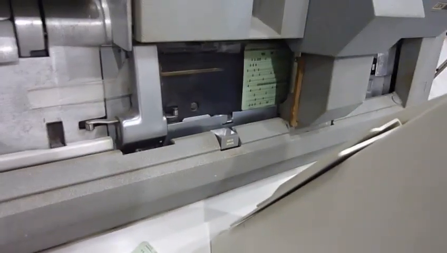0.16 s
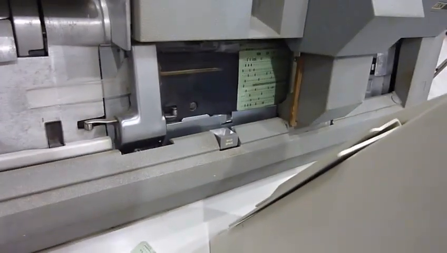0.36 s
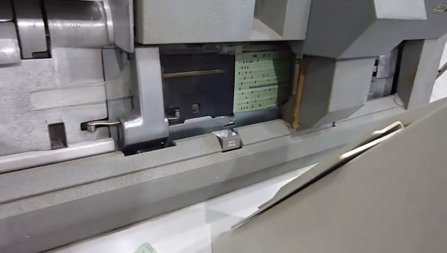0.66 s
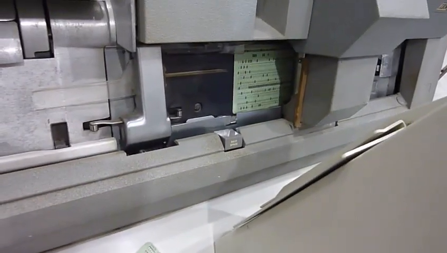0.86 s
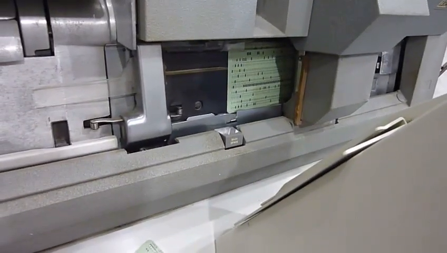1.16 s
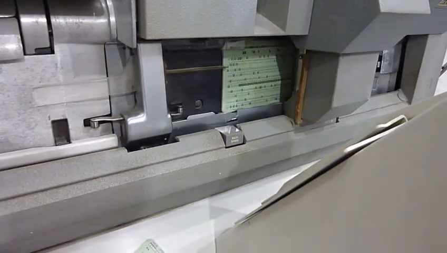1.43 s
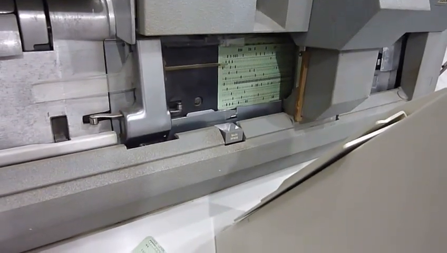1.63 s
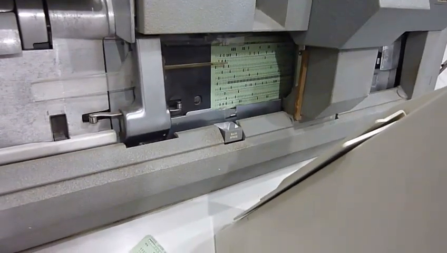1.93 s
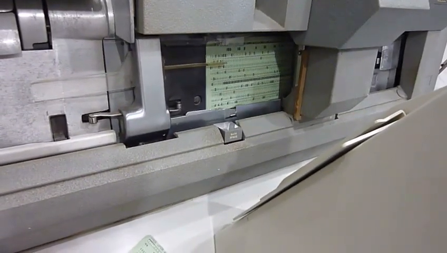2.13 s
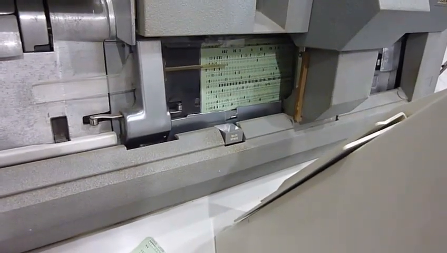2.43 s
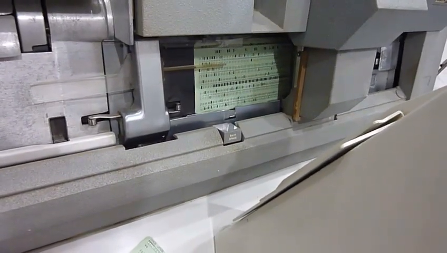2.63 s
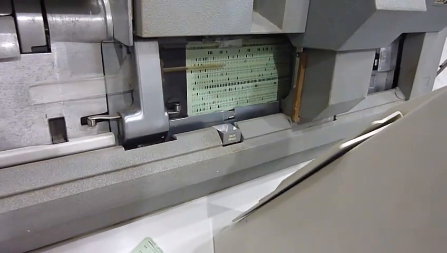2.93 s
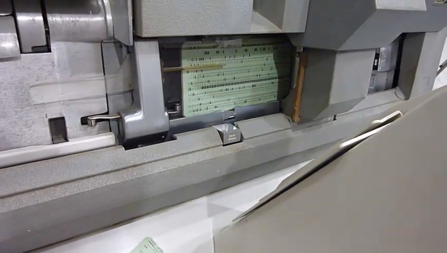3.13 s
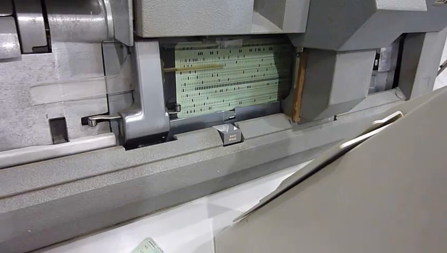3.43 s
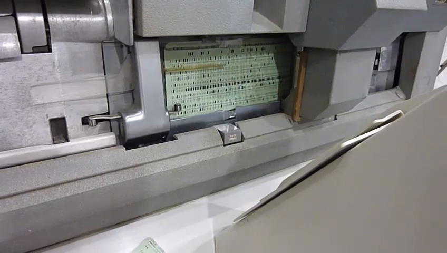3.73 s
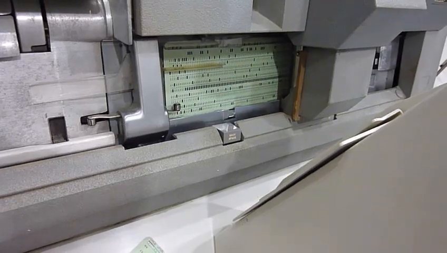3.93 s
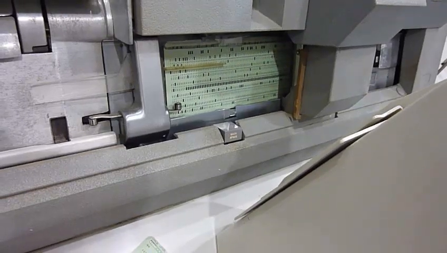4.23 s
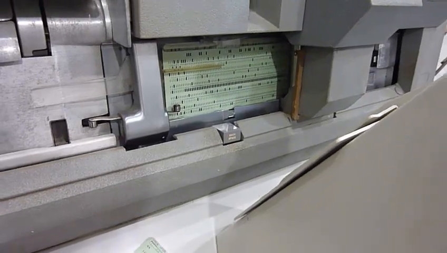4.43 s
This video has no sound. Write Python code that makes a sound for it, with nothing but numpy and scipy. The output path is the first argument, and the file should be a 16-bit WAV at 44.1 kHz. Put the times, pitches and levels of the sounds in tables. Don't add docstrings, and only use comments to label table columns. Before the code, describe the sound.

A dense, machine-gun-like mechanical clatter runs evenly from the start, each stroke mixing a sheet-metal knock, a sharp pawl snap and loose steel chatter, slightly different every time. After almost four seconds it ends abruptly with a light unloaded clack; room echo dies away and a much quieter idling motor hums, with small panel buzzes. Close, narrow-band stereo sound in a hard room.

```python
import sys
import numpy as np
from scipy import signal
from scipy.fft import rfft, irfft, next_fast_len
from scipy.io import wavfile
from scipy.ndimage import uniform_filter1d

SR = 44100
rng = np.random.default_rng(int(sys.argv[2]) if len(sys.argv) > 2 else 0)


def ratio(d):
    e = np.asarray(d, float) / 20
    return 10 ** e


def unload_wav(signal):
    wavfile.write(
        sys.argv[1],
        SR,
        np.round(np.clip(np.atleast_2d(signal).T, -1, 1) * 32767).astype(np.int16),
    )


N = 202013
LEAD = SR // 2
TURN_S, TURN_COUNT = .07771, 49
# (time [s], thud [dB], rattle [dB], clutch click [dB])
LAST_TURN = (3.845, -18, -12.5, -2)
LAST_S, LAST_THUD_DB, LAST_RATTLE_DB, LAST_CLICK_DB = LAST_TURN
# (frequency [Hz], level [dB])
MIC_RESPONSE = [(25, -30.5), (60, -16), (130, -15), (205, -15), (270, -1.5), (1500, 3.5), (1900, -3),
                (4400, -3.5), (7200, -2)]


def turns():
    # (time [s], shaft delay [ms])
    slip = [
        (0, -.4),
        (.9, -1.4),
        (.98, -.1),
        (2.22, -.2),
        (2.38, .9),
        (2.77, 0),
        (2.85, 1.9),
        (3.16, 1.9),
        (3.31, .6),
        (3.78, .4),
    ]
    # (side panel [dB], lid [dB], card bed [dB], pawl [dB])
    column_db = [(-4, -1.5, 2, 0), (2, -2.5, 2.5, 2), (0.5, 1.5, 3, 2), (-5.0, -2.5, 3, 2),
                 (-1, -2.5, 2, 3), (5.5, 0, 3.5, 2.5), (1.5, 0, -1.5, 1.5), (-11, 3, 0, 1.5),
                 (-3, -5.5, 2.5, 0), (-8.5, -2, -3.5, 0.5), (2, -3, 0, 4), (-1.5, -0.5, 2.5, -1),
                 (4.5, -1, -2, 4), (-2, 5, 1.5, 1.5), (3, -1.5, 2.5, 1.5), (7, 0.5, 1, 0.5),
                 (0, -1, -1, 2.5), (2, 0, -0.5, -2.5), (1.5, 0, 1, -0.5), (-6, -1, -1.5, 0.5),
                 (-5, 0, 0.5, 3), (-3.5, -1, 2, -0.5), (4, 1.5, -3, 0.5), (2, 2, 2.5, -0.5),
                 (-1, 0, 2.5, -1), (1, 1, -0.5, -1), (-7, 3.5, 0, 0.5), (-6, 0.5, 3, 3), (1, 0.5, -7, -2),
                 (1, -1.0, 3.5, 2), (0.5, 2, 3.5, 3.5), (1.5, -3, 1, -1.5), (3, 0, 1, 2),
                 (-1.5, -1, 3, -0.5), (4.5, 4.5, -1.5, 2.5), (0.5, 1.5, 2.5, -0.5), (4.5, -0.5, 2.5, 3.5),
                 (-8, 3.5, 0.5, 2.5), (-1, -1, 2, 2), (-8.5, 2.5, 0.5, 2.5), (-2.5, -1, 3, 2.5),
                 (3, -1.5, -1.5, 2), (-0.5, -0.5, -1, 0.5), (-2.5, 0.5, 2, 2), (4, 0, 0.5, 2),
                 (1, 0.5, 6, 1), (-2, 2.5, 0.5, 0), (-6, -5, 3, 1), (5, 0.5, -1.5, -2)]
    first_s = .0469
    s = first_s + TURN_S * np.arange(-5, TURN_COUNT)
    s = s + np.interp(s, *np.transpose(slip)) / 1000
    holes_db = np.pad(column_db, ((5, 0), (0, 0)))
    rattle_db = -0.82 * rng.standard_normal(len(s))
    loaded = np.column_stack([s, holes_db, rattle_db])
    return np.vstack([loaded, (LAST_S, 0, 0, 0, LAST_CLICK_DB, LAST_RATTLE_DB)]).T


def punch():
    # (time from punch [ms], pitch [Hz], width [Hz], T60 [ms], scatter [ms])
    linkage = [(-38, 4200, 5000, 40, 1), (-1, 2500, 5000, 9, .2), (-7, 3800, 2500, 16, .8),
               (30, 5200, 3500, 18, .5), (-4.2, 1900, 1400, 14, .3), (-4, 4700, 1500, 14, .4),
               (-1.5, 3300, 2200, 16, .6), (-1.5, 6500, 1500, 16, .3), (.6, 4700, 1300, 22, .4),
               (3.3, 2600, 1500, 16, .3), (7.5, 3000, 4000, 30, .9), (15, 1800, 1400, 30, 1),
               (21, 4000, 5000, 30, 2), (30, 2200, 900, 14, .5), (-9.5, 5200, 3500, 35, 1.8),
               (-7.5, 5750, 300, 14, .4), (31, 2750, 500, 14, .6)]
    linkage_db = [-14, -13, -4, -10, -4, -9, 0, -24.5, -12.5, 4, -2, -3, -10.5, -10.5, -8, -3, -22.5]
    # (time from release [ms], pitch [Hz], width [Hz], T60 [ms], scatter [ms])
    pawl = [
        (.3, 3500, 300, 9, .12),
        (1.2, 6600, 1200, 14, .4),
        (-.3, 1600, 600, 8, .2),
        (3.5, 2600, 1300, 14, .35),
        (9, 1700, 900, 12, .4),
        (11.5, 2000, 900, 10, .4),
        (1.2, 2850, 350, 9, .2),
        (.4, 3160, 260, 9, .12),
        (12.5, 2800, 350, 7, .2),
    ]
    pawl_contact_db = [-3.5, -11, -10, -0.5, -8.5, -15, -8.5, -4.5, -15.5]
    # (frequency [Hz], width [Hz], level [dB])
    steel_modes = [(2150, 99, -4), (2795, 75, -9), (3550, 160, -15), (4823, 94, 3), (5764, 47, -7.5),
                   (7080, 540, -2.5)]
    s, side_db, lid_db, bed_db, pawl_db, rattle_db = turns()
    release_s = s - np.where(s < LAST_S, .0331, .005)
    steel = ratio(-33.0) * clatter(linkage, linkage_db, s, rattle_db, snap=3.18)
    steel += ratio(-32.5) * clatter(pawl, pawl_contact_db, release_s, pawl_db, snap=4.33)
    body = ratio(11.0) * cabinet(s, side_db, lid_db, bed_db)
    return body, filtered(steel, lambda f: 1 + modes(steel_modes)(f))


def cabinet(s, side_db, lid_db, bed_db):
    # (time from punch [ms], scatter [ms])
    knocks = [
        (-25, .3),
        (-11.3, .3),
        (-5.5, .3),
        (-1.6, .2),
        (3.5, .3),
        (10.2, .3),
        (13, .3),
        (23, .35),
        (31, .3),
    ]
    knock_db = [
        [-32, -30.5, -6, -5, -9, -32, -18, 0, -12.5],
        [-3, -4.5, -12, 1, -32.5, -13, -15, -20, -7.5],
        [-9, -21.5, -38.5, 0.5, -10.5, -31, -25, -10.5, -30],
        [-9.5, -16.5, -12.5, -7.5, -12, -15, -0.5, -21.5, -15.5],
        [-13.5, -13, -14, -2, -13, -5.5, -21, -20.5, -13],
        [-10, -8, -4.5, -1.5, -31.5, -17, -17, -20.5, -7],
    ]
    panel_hz = [272, 309, 338, 360, 400, 451, 575, 604, 720, 775, 797, 865, 930, 1000, 1090, 1205, 1310,
                1420, 1510, 1590]
    # (width [Hz], level [dB])
    panels = [(30.3, -15), (15, 1), (17, -13.5), (11.5, -4.5), (18.3, -19.5), (9.75, 3.5), (24, -5),
              (17, -7.5), (15.8, 0), (30, -6.5), (27, -8), (47, -9), (47.6, -13.5), (60.4, -11.5),
              (54.3, -15.5), (53.6, -12), (59, -12.5), (58, -17.5), (58.6, -30.5), (65, -18.5)]
    thrown = [1, 1, 1, 1, -1, 1, -1, 1, -1, -1, -1, 1, -1, 1, -1, 1, -1, 1, -1, 1]
    part_top_hz = [330, 420, 500, 660, 830]
    part_late_ms = [3.5, 1.1, 0.2, 2.23, 0.88, -2.5]
    thud_db = [0.26, 0.26, 0.2, .3, 0.35, .3, .3, 0.36, 0.22, 0.25, 0.33, 0.27, 0.35, .3, .3, .3, 0.34, .3,
               0.24, 0.26, .3, 0.34, 0.18, .3, .3, .3, .3, 0.18, .3, 0.27, .3, 0.33, 0.42, .3, .3, 0.24,
               0.46, 0.24, 0.46, 0.39, 0.48, 0.33, 0.2, 0.28, 0.2, .3, 0.5, 0.35, 0.37]
    ms, scatter = np.transpose(knocks)
    luck = rng.standard_normal((len(s), len(ms), 3))
    base_db = np.pad(thud_db, (len(s) - TURN_COUNT - 1, 1))
    part_db = [base_db, 0 * s, 0 * s, side_db, lid_db, bed_db]
    out = np.zeros((2, N + LEAD))
    for k, (hz, (width, panel_db)) in enumerate(zip(panel_hz, panels)):
        part = np.searchsorted(part_top_hz, hz)
        loose = .15 if part < 3 else 1
        late_ms = ms + part_late_ms[part] + loose * scatter * luck[..., 0]
        at = (s[:, None] + late_ms / 1000).ravel()
        shake_db = part_db[part] + LAST_THUD_DB * (s >= LAST_S)
        luck_db = 0.7 * luck[..., 1] + 1.1 * loose * rng.standard_normal(luck.shape[:2])
        push = ratio(np.array(knock_db[part]) + shake_db[:, None] + luck_db)
        travel_s = np.sin(2.4 * k) / hz ** .5 / 300
        blows = [spikes(at + travel_s, (push * sign).ravel()) for sign in (1, np.sign(luck[..., 2]))]
        out += thrown[k] * ratio(panel_db) * width / 1000 * resonator(blows, hz, width)
    return out


def clatter(contacts, levels_db, s, db, snap):
    out = np.zeros((2, N + LEAD))
    grit = ratio(1.15 * rng.standard_normal(N + LEAD)) * rng.standard_normal((2, N + LEAD))
    shared = rng.standard_normal(len(s))
    last_loaded = s > LAST_S - TURN_S
    for k, ((ms, hz, width, t60_ms, scatter), level_db) in enumerate(zip(contacts, levels_db)):
        luck = rng.standard_normal((len(s), 2))
        at = s + (ms + scatter * (.8 * shared + .6 * luck[:, 0])) / 1000
        unlatched_db = -9 * (ms > 14) * last_loaded
        train = spikes(at, ratio(db + level_db + unlatched_db + 0.35 * luck[:, 1]))
        rise = signal.lfilter([.04], [1, -.96], train)
        shape = signal.lfilter([1], [1, -ratio(-60000 / t60_ms / SR)], rise)
        chatter = shape * np.roll(grit, 7919 * k, axis=1) + snap * train
        out += np.sqrt(4 * np.pi * width / 1000) * resonator(chatter, hz, width)
    return out


def echoes(body, steel):
    tails = 5
    phase = np.arange(N + LEAD) / SR / TURN_S % tails

    def share(k):
        distance = np.abs((phase - k + tails / 2) % tails - tails / 2)
        return np.clip(1 - distance, 0, 1)

    return room(ratio(-7.5) * body) + sum(room(ratio(0.37) * share(k) * steel) for k in range(tails))


def room(x):
    # (frequency [Hz], T60 [s])
    decay = [(250, 0.46), (800, 0.63), (2500, 0.64), (7000, 0.77)]
    hz, t, z = signal.stft(rng.standard_normal((2, SR * 4 // 5)), SR, nperseg=256)
    tail = signal.istft(z * ratio(-60 * t / along(decay, hz)[:, None]), SR, nperseg=256)[1]
    tail = tail * np.minimum(np.arange(tail.shape[1]) / SR / .008, 1)
    answer = np.pad(tail, ((0, 0), (180, 0))) / np.linalg.norm(tail[0])
    return signal.fftconvolve(x, answer, axes=1)[:, :x.shape[1]]


def motor():
    # (frequency [Hz], level per Hz [dB])
    whirr_spectrum = [(53, -63.5), (90, -32.5), (177, -19.5), (242, -8), (369, -7), (702, -2), (874, -7),
                      (1630, -10.5), (1890, -14.5), (2990, -11), (4180, -21), (4810, -11.5), (5370, -22.5),
                      (7200, -19.5), (9360, -64), (15800, -120)]
    # (frequency [Hz], width [Hz], rms level [dB])
    motor_lines = [(155, 8, -59), (445, 30, -60.5), (687, 9.1, -61.5), (804, 15, -54.5), (1147, 14, -62),
                   (1390, 15, -63.5), (1632, 9, -57)]
    # (time [s], pitch [Hz], rms level [dB], half length [ms])
    shudders = [(3.99, 602, -47, 54), (4.176, 242.6, -44, 25), (4.265, 600, -45, 67),
                (4.28, 273, -44.5, 26), (4.34, 760, -41.5, 11), (4.363, 242, -42.5, 63),
                (4.365, 467, -46, 29), (4.379, 586, -43, 47), (4.384, 704, -46, 38), (4.479, 266, -42, 33),
                (4.525, 233, -43.5, 22), (4.526, 596, -45, 18), (4.53, 699, -46, 61)]
    t = np.arange(N) / SR

    def noise():
        return rng.standard_normal((2, N))

    def line(hz, width):
        return unit(filtered(noise(), lambda f: np.exp(-((f - hz) / width) ** 2)))

    def fuzz(f):
        return sum(ratio(db) * np.sqrt(SR / 2.5 / width) * np.exp(-((f - hz) / width) ** 2)
                   for hz, width, db in motor_lines)

    rush = filtered(patchy(noise(), depth_db=1.5),
                    lambda f: ratio(along(whirr_spectrum, f) - along(MIC_RESPONSE, f)))
    whirr = ratio(-43) * ratio(-2.5 * (t - 5.0)) * unit(rush)
    hum = ratio(-52.5) * (line(240, 17.0) + line(250, 0.98) + 1.5 * line(284, 37))
    drift = np.cumsum(noise(), axis=1) * 0.01
    song = np.zeros((2, N))
    for s, hz, db, half_ms in shudders:
        swell = np.exp(-((t - s) * 1000 / half_ms) ** 2)
        song += ratio(db + 3.5) * swell * np.sin(2 * np.pi * hz * t + drift * hz / 600)
    return whirr + hum + song + filtered(noise(), fuzz)


def patchy(x, depth_db):
    z = signal.stft(x, nperseg=512)[2]
    field = uniform_filter1d(rng.standard_normal(z.shape[1:]), size=4, axis=0)
    field = uniform_filter1d(field, size=5, axis=1)
    return signal.istft(z * ratio(depth_db * unit(field)), nperseg=512)[1][:, :N]


def resonator(x, hz, width):
    fade = np.exp(-np.pi * width / SR)
    return signal.lfilter([1, -1], [1, -2 * fade * np.cos(2 * np.pi * hz / SR), fade ** 2], x)


def modes(table):
    return lambda f: sum(ratio(db) * 1j * f * w / (c * c - f * f + 1j * f * w) for c, w, db in table)


def spikes(s, size):
    at = np.clip(np.round(s * SR).astype(int) + LEAD, 0, N + LEAD - 1)
    return np.bincount(at, size, N + LEAD)


def unit(x):
    return x / np.sqrt(np.mean(x ** 2) + 1e-20)


def along(points, hz):
    f, v = np.transpose(points)
    return np.interp(np.log(hz + 1), np.log(f + 1), v)


def filtered(x, response):
    m = next_fast_len(x.shape[-1] + SR // 4)
    return irfft(rfft(x, m) * response(np.fft.rfftfreq(m, 1 / SR)), m)[..., :x.shape[-1]]


def scene():
    # (frequency [Hz], coherence [-])
    alike = [(60, 0.99), (250, 0.99), (700, 0.985), (2400, 0.91), (8000, 0.56)]
    # (frequency [Hz], level [dB])
    lean = [(60, 0.15), (310, 1.1), (1580, 1.5), (8090, 0.95)]
    # (frequency [Hz], phase lead [rad])
    ahead = [(300, .03), (1000, .2), (2930, .5), (5170, .25), (7500, .15)]
    body, steel = punch()
    pair = (body + steel + echoes(body, steel))[:, LEAD:] + motor()

    def mixing(hz):
        turn = np.arccos(np.clip(along(alike, hz), 0, 1)) / 2
        return np.array([np.cos(turn), np.sin(turn)])

    def ports(hz):
        halves = [.5, -.5]
        return ratio(np.outer(halves, along(lean, hz))) * np.exp(1j * np.outer(halves, along(ahead, hz)))

    mid, side = filtered(pair, mixing)
    return filtered(np.array([mid + side, mid - side]), ports)


def roll_off(x):
    return signal.sosfilt(signal.butter(12, 9250, fs=SR, output="sos"), x)


def record(dry):
    # (frequency [Hz], level [dB])
    top_edge = [(7280, 0), (7400, -21.5), (7540, -42.5), (8000, -85)]
    # (start [s], end [s])
    mirror_gaps = [
        (2.335, 2.4),
        (2.475, 2.54),
        (3.105, 3.14),
        (3.66, 3.725),
    ]

    def notch(seam_hz, width_hz):
        return lambda hz: ratio(-34 * np.exp(-np.abs(hz - seam_hz) / width_hz))

    def edge_db(hz):
        return np.interp(hz, [8550, 8700, 8920, 8970], [-40, -15.5, -21, -90], left=-200, right=-200)

    x = filtered(dry, lambda hz: ratio(along(MIC_RESPONSE, hz) + np.interp(hz, *np.transpose(top_edge))))
    high = np.repeat(1. * (rng.random(N // 1024 + 1) > .5), 1024)[:N]
    high = uniform_filter1d(high, size=512)
    upper = filtered(x, notch(seam_hz=5525, width_hz=94))
    lower = filtered(x, notch(seam_hz=5390, width_hz=71))
    x = high * upper + (1 - high) * lower
    mono = x.mean(axis=0)
    mirror = (.7 * mono + .3 * x) * np.cos(2 * np.pi * 16000 * np.arange(N) / SR)
    loudness = np.sqrt(np.abs(uniform_filter1d(mono ** 2, size=2048)))
    rumble = unit(filtered(rng.standard_normal(N), lambda hz: 1 / (1 + (hz / 170) ** 4)))
    grit = ratio(-43.0) * loudness ** 1.68 * rumble
    treble = np.sqrt(np.abs(uniform_filter1d(np.gradient(mono) ** 2, size=4096)))
    kept = np.repeat(rng.random(N // 1024 + 1) > .07, 1024)[:N]
    kept = kept * (treble > ratio(1.6) * treble[-8192:].mean())
    kept = kept * (np.searchsorted(np.ravel(mirror_gaps), np.arange(N) / SR) % 2 == 0)
    gated = uniform_filter1d(1. * kept, size=512) * mirror
    x = x + filtered(gated, lambda hz: ratio(edge_db(hz))) + ratio(12.0) * grit
    return roll_off(x)


dry = scene()
out = record(dry)
unload_wav(out)
```